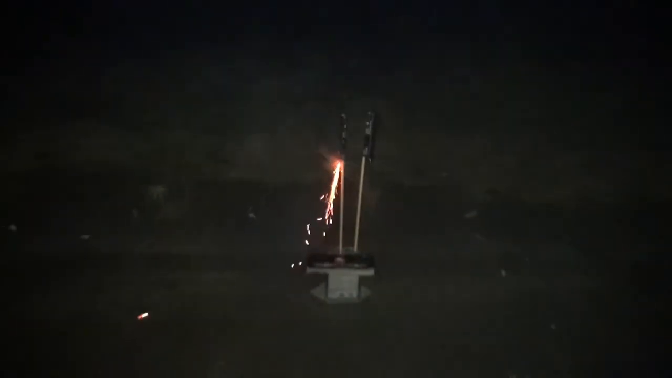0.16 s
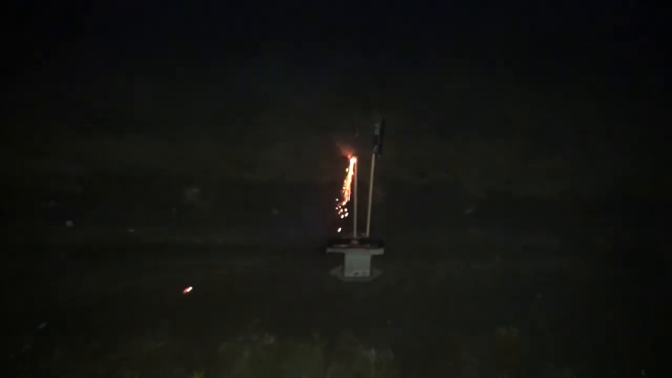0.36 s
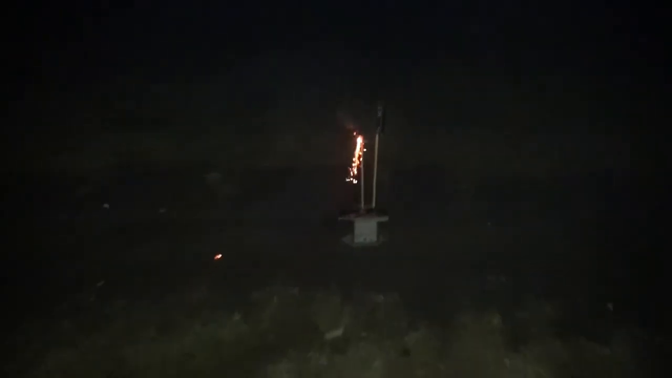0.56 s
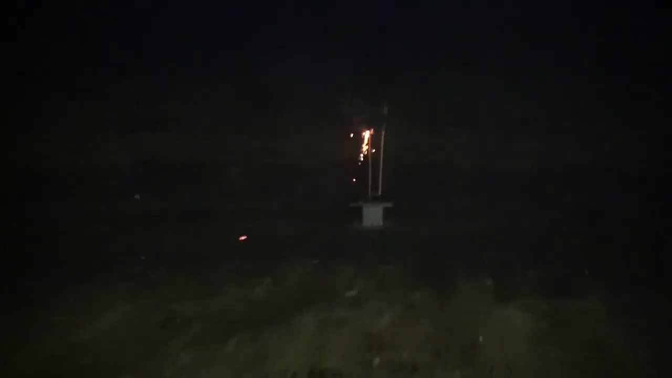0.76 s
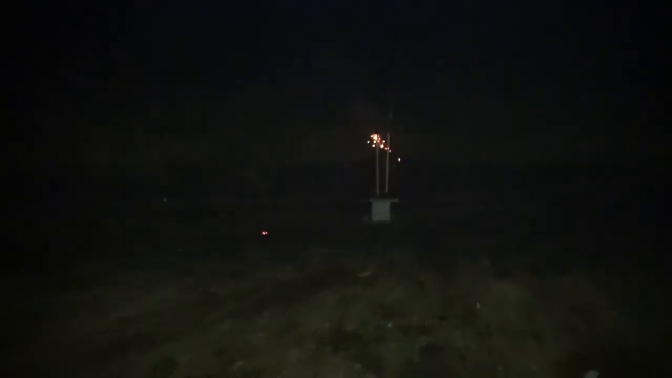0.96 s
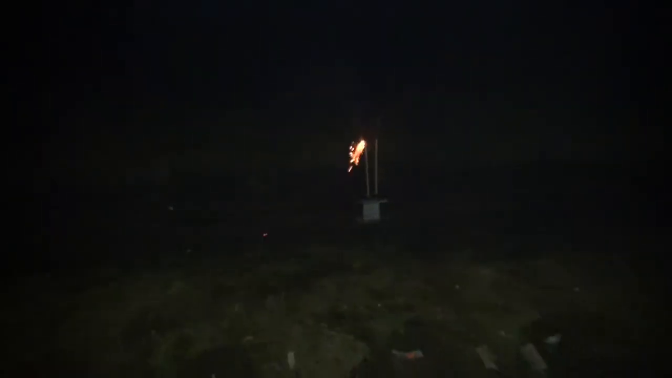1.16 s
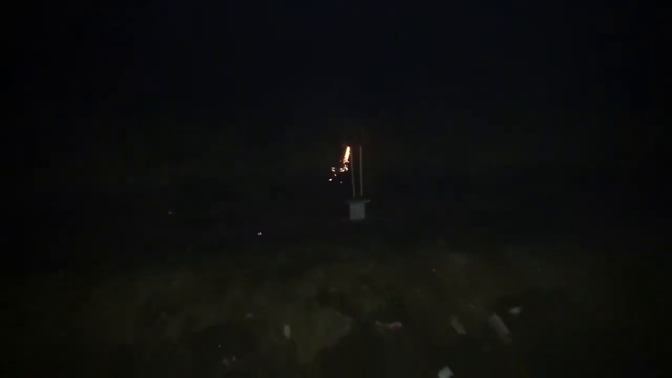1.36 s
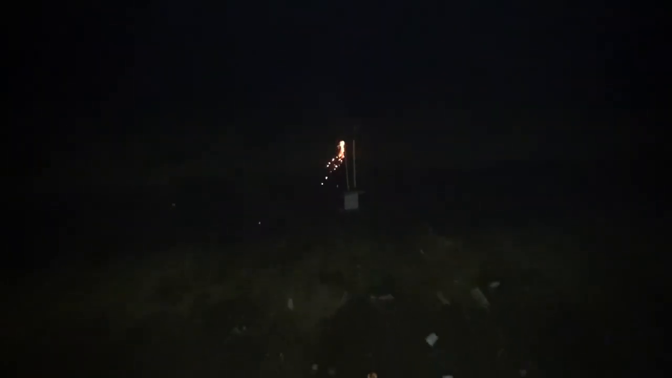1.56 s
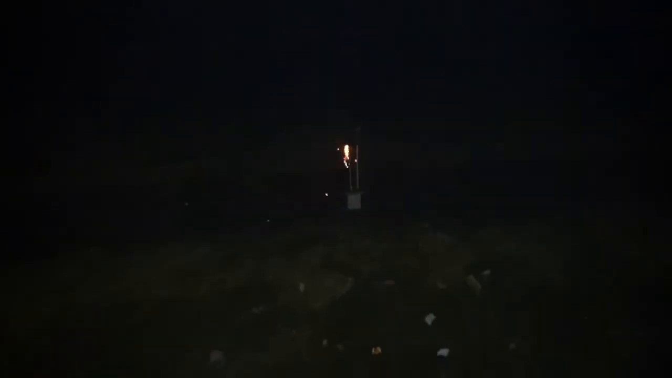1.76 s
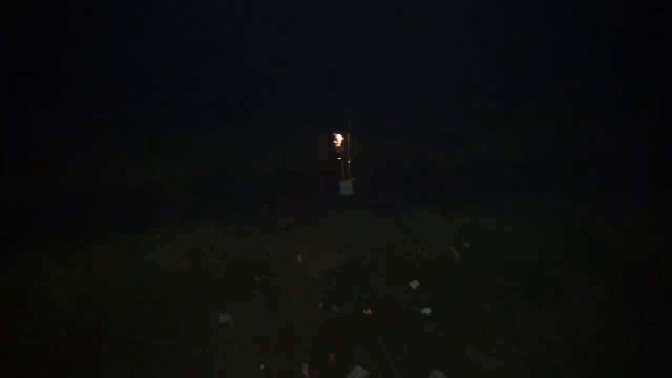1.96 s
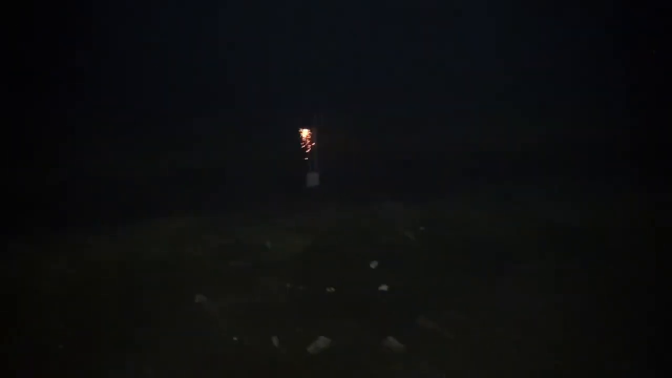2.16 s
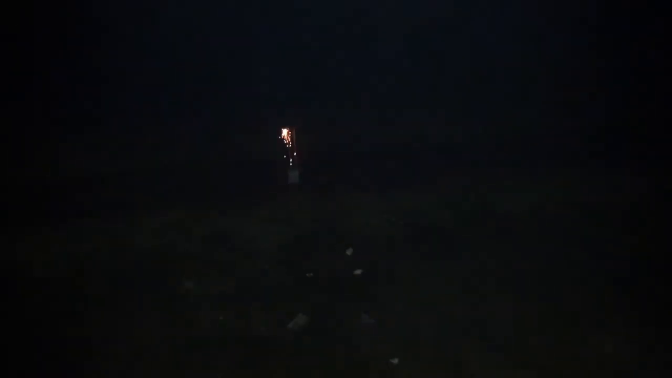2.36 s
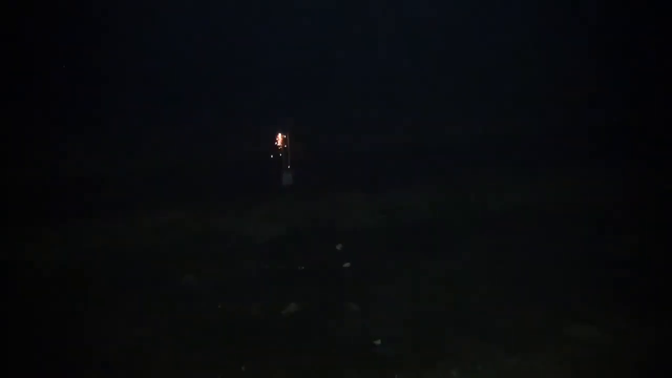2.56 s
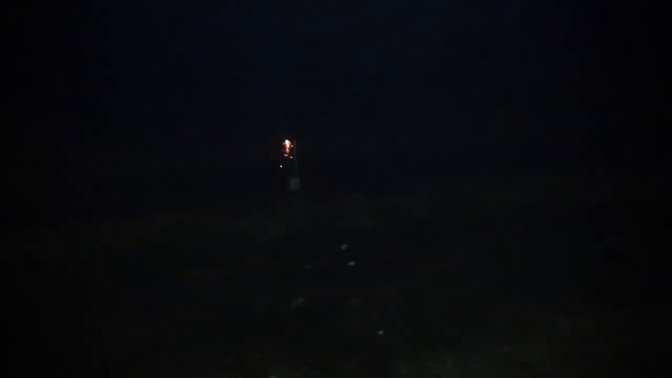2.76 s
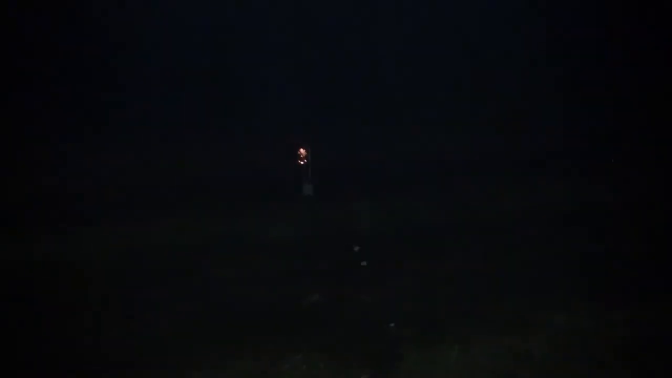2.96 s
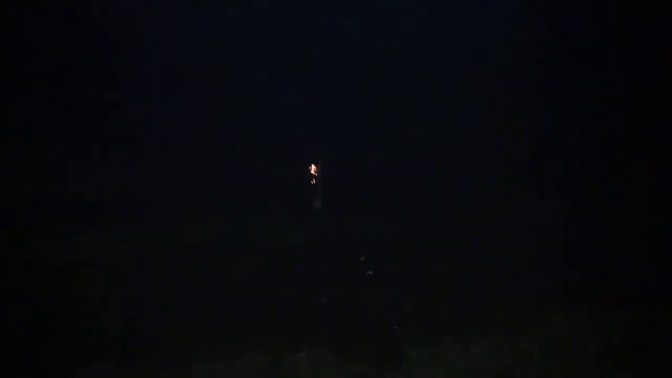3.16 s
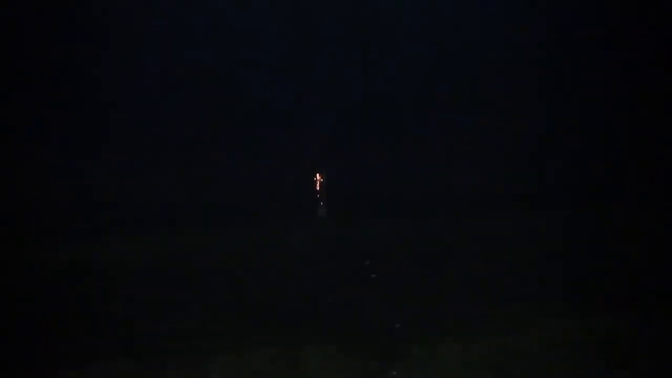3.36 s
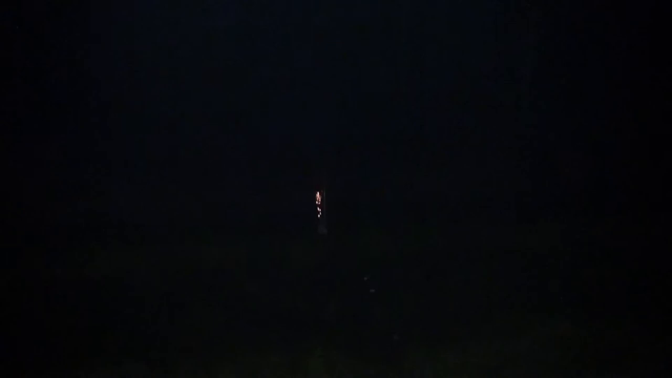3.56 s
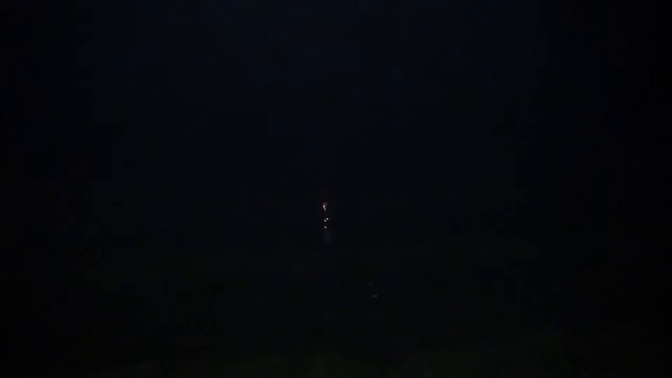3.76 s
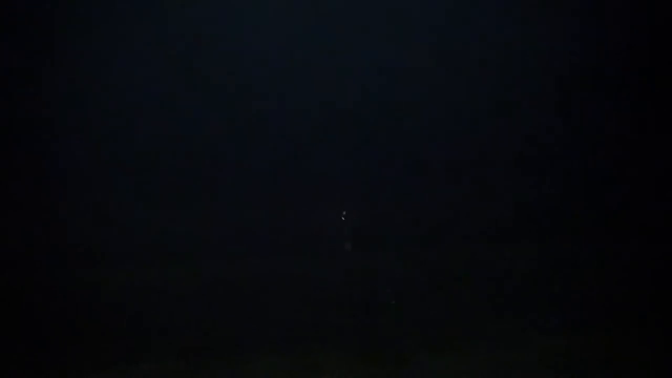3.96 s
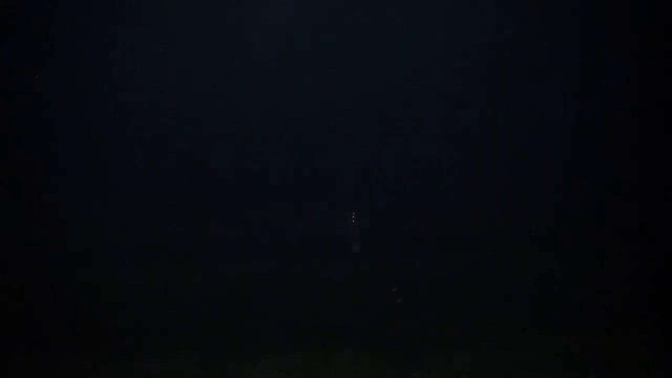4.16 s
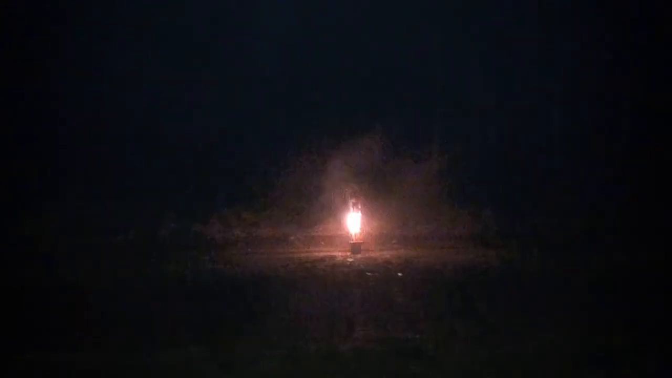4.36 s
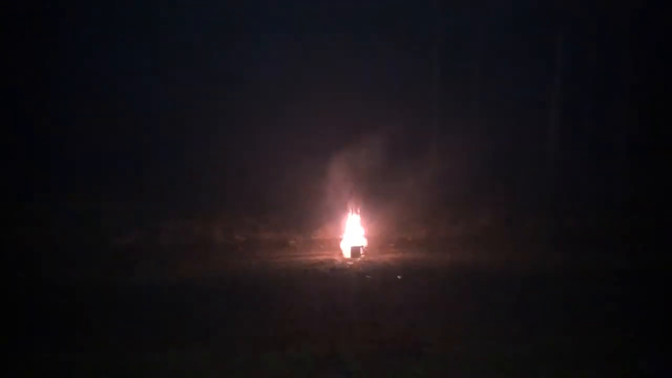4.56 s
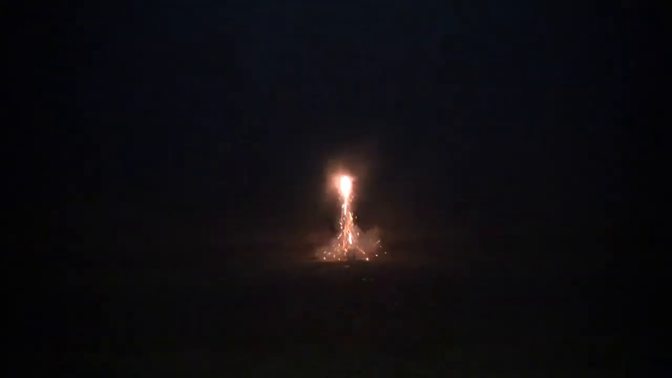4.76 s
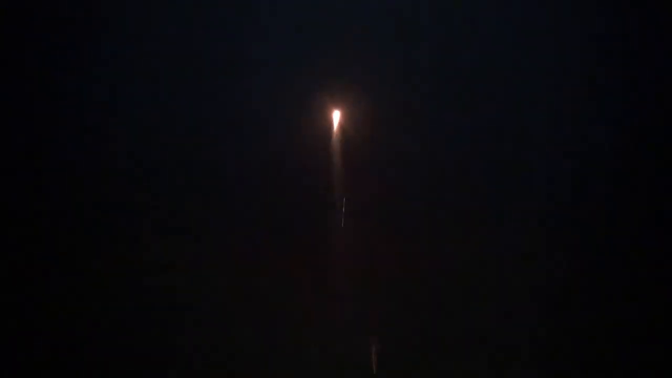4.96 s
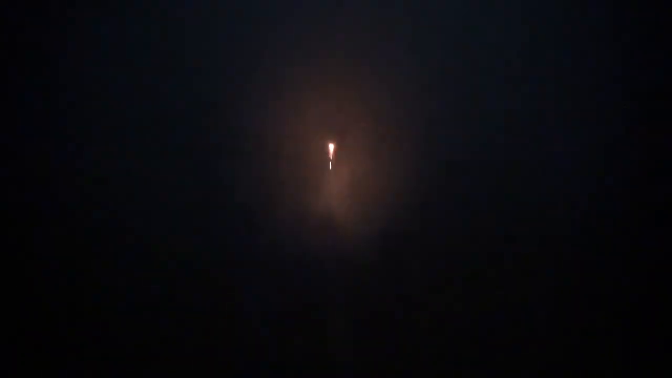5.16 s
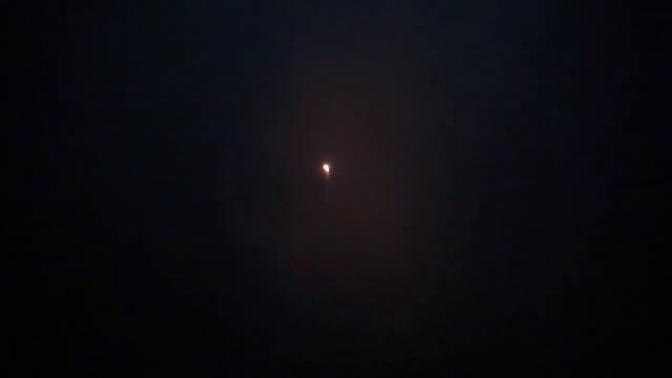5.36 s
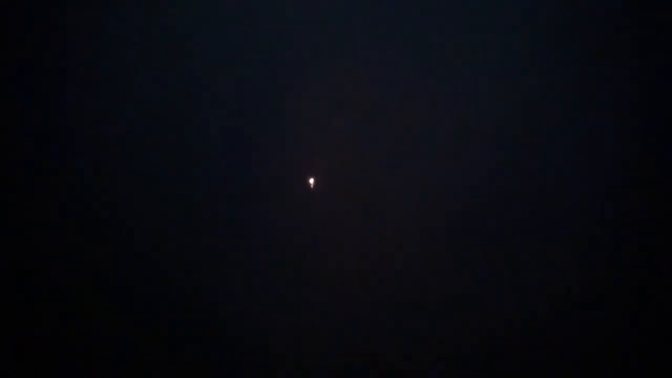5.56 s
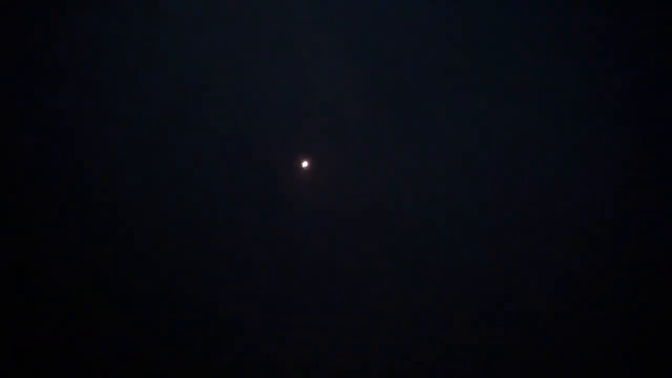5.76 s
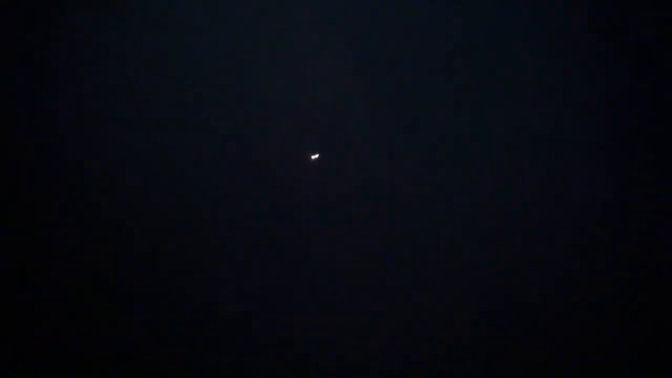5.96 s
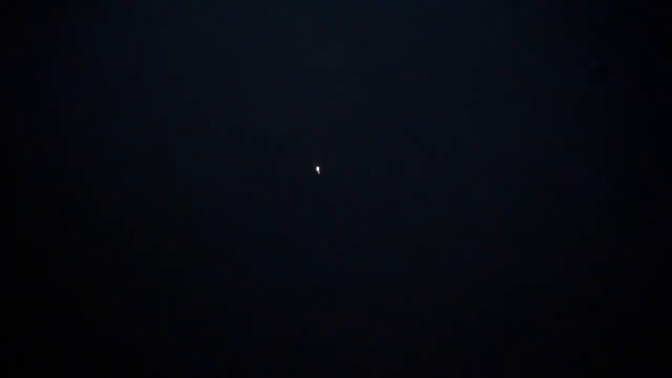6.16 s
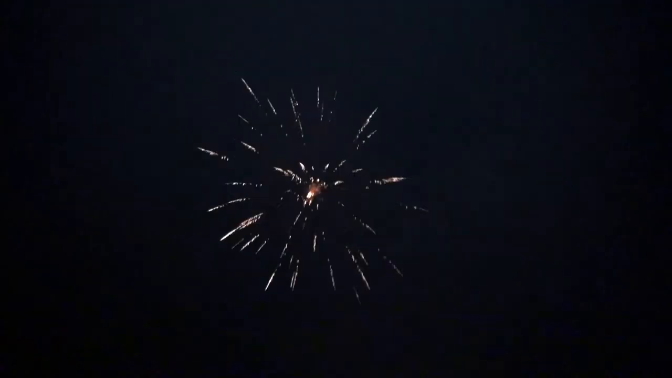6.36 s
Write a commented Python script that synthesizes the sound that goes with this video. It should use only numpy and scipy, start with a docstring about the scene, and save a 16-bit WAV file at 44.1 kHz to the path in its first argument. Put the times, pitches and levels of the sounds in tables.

```python
"""Whistling rocket in a field at night.

The fuse fizzes and spits while the camera backs away over the grass. The motor catches with a hiss,
then shrieks and climbs; the pitch falls as the tube burns hollow and the rocket recedes. The ground
mirrors the sound, distant trees scatter it back, and the shriek overloads the microphone."""
import sys
import numpy as np
from scipy import signal
from scipy.fft import rfft, irfft, next_fast_len
from scipy.io import wavfile
from scipy.ndimage import map_coordinates

SR = 44100
rng = np.random.default_rng(int(sys.argv[2]) if len(sys.argv) > 2 else 0)


def inscribe(sig):
    """Save sig as 16-bit PCM at rate SR to the path in sys.argv[1].

    A 1-D sig is mono; a 2-D sig holds one channel per row.
    Samples are clipped to [-1, 1] before scaling.
    """
    pcm = np.round(np.clip(np.atleast_2d(sig).T, -1, 1) * 32767)
    wavfile.write(sys.argv[1], SR, pcm.astype(np.int16))


N = 282240
TIME = np.arange(N) / SR
IGNITION_S, LAUNCH_S, LIFT_OFF_S = 4.53, 4.688, 4.738
CAMERA_HEIGHT_M, STAND_HEIGHT_M = 1.5, 0.29
TOP_HZ = 15700


def amp(db):
    """Decibels to gain."""
    return 10 ** (np.asarray(db) / 20)


def unit(x):
    """Scale to rms 1."""
    return x / np.sqrt(np.mean(x ** 2) + 1e-20)


def along(points, hz):
    """Read (f/Hz, value) points on a log axis."""
    f, v = np.transpose(points)
    return np.interp(np.log(hz + 1), np.log(f + 1), v)


def curves(rows):
    """Per-sample curve for each column after t/s."""
    s, *cols = np.transpose(rows)
    return [np.interp(TIME, s, c) for c in cols]


def wobble(knots_per_s):
    """Smooth random curve."""
    knots = rng.standard_normal(int(N * knots_per_s / SR) + 4)
    return map_coordinates(knots, [TIME * knots_per_s])


def spurt(peak_s, half_s):
    """Gaussian swell, peak 1."""
    return np.exp(-((TIME - peak_s) / half_s) ** 2)


def filtered(x, response):
    """Zero-phase filter with gain response(hz)."""
    size = next_fast_len(N + SR // 2)
    return irfft(rfft(x, size) * response(np.fft.rfftfreq(size, 1 / SR)), size)[..., :N]


def dulled(x, share, corner_hz):
    """Low-pass a share of x."""
    share = np.clip(share, 0, 1)
    return (1 - share) * x + share * filtered(x, lambda hz: 1 / (1 + (hz / corner_hz) ** 4))


def pair(apart, size=N):
    """White noise at two ports; apart is the uncorrelated share of the power."""
    common = np.sqrt(1 - apart) * rng.standard_normal(size)
    return common + np.sqrt(apart) * rng.standard_normal((2, size))


def rush(colour, apart):
    """Coloured stereo noise, rms 1."""
    return unit(filtered(pair(apart), lambda hz: amp(along(colour, hz))))


def burst(start_s, centre_hz, octaves, envelope):
    """Short band of noise under an envelope."""
    size = len(envelope)
    hz = np.fft.rfftfreq(size, 1 / SR) + 1
    band = 1 / (1 + (np.log2(hz / centre_hz) / octaves) ** 2)
    sound = unit(irfft(rfft(pair(apart=0.12, size=size)) * band, size)) * envelope
    return np.pad(sound, ((0, 0), (round(start_s * SR), N)))[:, :N]


def positions():
    """The camera backs away, then stands; the rocket speeds up toward the balance of drag and thrust."""
    start_m, pace_m_per_s, stop_s = 1.2, 1.27, 3.7
    thrust_m_per_s2, top_speed_m_per_s = 36, 36.8
    away_m = start_m + pace_m_per_s * np.minimum(TIME, stop_s)
    run_up_s = top_speed_m_per_s / thrust_m_per_s2
    flight_s = np.maximum(TIME - LIFT_OFF_S, 0)
    climb_m = top_speed_m_per_s * run_up_s * np.log(np.cosh(flight_s / run_up_s))
    return away_m, STAND_HEIGHT_M + climb_m


def distance_db():
    """Direct-path gain re 1 m."""
    away_m, height_m = positions()
    return -20 * np.log10(np.hypot(away_m, height_m - CAMERA_HEIGHT_M))


def grounded(x, mirror):
    """Add the ground reflection at gain mirror: a comb that slides with the geometry."""
    sound_m_per_s = 343
    away_m, height_m = positions()
    direct_m = np.hypot(away_m, height_m - CAMERA_HEIGHT_M)
    bounced_m = np.hypot(away_m, height_m + CAMERA_HEIGHT_M)
    lag_s = (bounced_m - direct_m) / sound_m_per_s
    echo = np.array([map_coordinates(side, [(TIME - lag_s) * SR], order=3) for side in x])
    return (x + mirror * echo) / np.sqrt(1 + mirror ** 2)


def trees(x, apart, build_s):
    """Diffuse echo from the field's edge; the treble dies first."""
    # echo decay: f/Hz, t60/s
    decay_times = [(200, 2.2), (2000, 1.61), (4000, 1.45), (8000, 1.24), (15000, 0.76)]
    hz, t, spectra = signal.stft(pair(apart, size=2 * SR), SR, nperseg=256)
    envelope = amp(-60 * t / along(decay_times, hz)[:, None]) * (1 - np.exp(-t / build_s))
    tail = signal.istft(spectra * envelope, SR, nperseg=256)[1]
    return signal.fftconvolve(x[None], tail / np.linalg.norm(tail[0]), axes=1)[:, :N]


def night():
    """Still air over the field; a breeze on each port, stirred by the camera's first move."""
    # breeze spectrum: f/Hz, density/dB
    rumble = [(8.8, -7), (15, 7), (31, -1.5), (70, -14), (92, -29), (145, -37), (250, -40), (320, -55),
              (550, -120)]
    # still-air spectrum: f/Hz, density/dB
    still_air = [(60, -9), (177, -7), (900, 0.5), (1600, -13), (3000, -11.5), (7000, -9), (9000, -13),
                 (12000, -15), (15400, -30)]
    stir_db, settle_s = 14, 1.33
    breeze_db = -54.5 + stir_db * np.exp(-TIME / settle_s) + 2.6 * wobble(5.4)
    return amp(breeze_db) * rush(rumble, apart=1.0) + amp(-69) * rush(still_air, apart=0.52)


def walking():
    """Soft steps backward: shoes brush the grass; steps and grip jolt the camera."""
    # grass scuffs: t/s, relative level/dB, centre/Hz, length/s, width/octaves
    scuffs = [(0.108, -42.5, 1430, 0.045, 0.52), (0.17, -40, 1070, 0.041, 0.82),
              (0.201, -40.5, 1890, 0.035, 0.59), (0.359, -36.5, 1180, 0.025, 0.45),
              (0.838, -39, 2230, 0.039, 1.15), (1.034, -43.5, 660, 0.032, 0.29),
              (3.375, -50, 1600, 0.027, 0.85)]
    # camera bumps: t/s, level/dB, t60/s
    bumps = [(.024, -42.5, 0.18), (.088, -44.5, 0.59), (0.27, -47, 0.13), (0.47, -49.5, 0.34),
             (0.653, -30.5, 0.098), (.969, -43.5, 0.17), (1.075, -46, 0.2), (1.532, -54, .13),
             (1.967, -55, 0.08), (2.18, -52.5, 0.21), (2.449, -54, 0.11), (2.605, -58, .1),
             (2.694, -56, 0.12), (4.117, -49, 0.091)]
    # bump spectrum: f/Hz, density/dB
    bump_colour = [(30, -21), (90, 12), (170, 0.5), (260, -4.5), (330, 5), (430, -16), (600, -33),
                   (1500, -54)]
    attack_s = 0.0087
    t = TIME[:SR // 4]
    grass, jolts = np.zeros((2, N)), np.zeros(N)
    for start_s, db, hz, length_s, octaves in scuffs:
        arch = np.sin(np.pi * np.clip(t / length_s, 0, 1))
        grass += burst(start_s, hz, octaves, amp(db - 11.5) * arch)
    for start_s, db, t60_s in bumps:
        age_s = np.maximum(TIME - start_s, 0)
        jolts += amp(db - 60 * age_s / t60_s) * (1 - np.exp(-age_s / attack_s))
    return grass + jolts * rush(bump_colour, apart=0.54)


def burn_levels():
    """The fizz fades as the spark creeps toward the nozzle; the flame flares just before ignition."""
    # fuse spurts: peak t/s, half length/s, fizz change/dB, flame change/dB
    spurts = [(0.106, 0.07, 6, 2), (0.315, 0.13, -1.5, 12.5), (0.46, .04, 4.5, -7),
              (.635, 0.042, 6.5, -5.5), (1.423, 0.39, 4.5, -1), (2.326, 0.079, 4.5, 5.5),
              (3.39, 0.069, 5, 4), (3.55, .025, 6, -1), (3.84, .03, 10, 0), (4.11, 0.022, 4.5, 8)]
    fade_db_per_s, flare_db, flare_s = 2, 18.5, 0.23
    fizz_db = -50 + distance_db() - fade_db_per_s * TIME
    flame_db = -72 + flare_db * np.exp(np.minimum(TIME - IGNITION_S, 0) / flare_s)
    for peak_s, half_s, more_fizz_db, more_flame_db in spurts:
        fizz_db += more_fizz_db * spurt(peak_s, half_s)
        flame_db += more_flame_db * spurt(peak_s, half_s)
    return fizz_db, flame_db


def flame_ring():
    """Half-pitched band of flame noise that rises and widens into a puff at ignition."""
    # band track: t/s, centre/Hz, level/dB
    track = [(.9, 1200, -82), (2, 1852, -70.5), (3.7, 2290, -71.5), (4.32, 2030, -62), (4.5, 2990, -58),
             (4.63, 3400, -51), (4.68, 3650, -42)]
    # band widening: t/s, wide share/0-1
    widening = [(4.3, .1), (4.5, .85)]
    ring_hz, ring_db = curves(track)
    share, = curves(widening)
    phase = 2 * np.pi * np.cumsum(ring_hz) / SR
    narrow = wobble(470) * np.cos(phase) + wobble(580) * np.sin(phase)
    wide = wobble(1300) * np.cos(phase) + wobble(1300) * np.sin(phase)
    return amp(ring_db + 0.98 * wobble(18)) * (np.sqrt(1 - share) * narrow + np.sqrt(share) * wide)


def fuse():
    """Powder burns in a stream of tiny sparks over a breathy flame, with a few louder spits."""
    # fizz spectrum: f/Hz, density/dB
    fizz_colour = [(300, -2), (600, -3), (1200, -6), (3400, -8), (6000, -6), (8500, -5.5), (10500, -10),
                   (13000, -7), (15500, -11)]
    # flame spectrum: f/Hz, density/dB
    flame_colour = [(300, -13), (900, -6), (1400, -0.5), (2200, -6), (3000, -6), (4000, -8), (6000, -11),
                    (12000, -45)]
    # ground reflection of the fizz, stronger at a flatter angle: t/s, gain/0-1
    grazing = [(.3, .12), (1.2, .55)]
    # fuse spits: t/s, relative level/dB, centre/Hz, t60/s
    spits = [(0.538, -39.5, 5440, 0.06), (1.002, -34, 5000, 0.034), (1.31, -42, 1140, .04),
             (1.619, -43.5, 980, 0.047), (1.707, -40, 1400, 0.053), (3.415, -45, 1000, .04)]
    spark_db, sputter_db, surge_db = 1.6, 1.2, 1.1
    fizz_db, flame_db = burn_levels()
    sparks = unit(amp(spark_db * wobble(630) + sputter_db * wobble(29.52) + surge_db * wobble(12)))
    in_nozzle = (TIME - 3.3) / 0.7
    fizz = amp(fizz_db) * sparks * dulled(rush(fizz_colour, apart=0.39), in_nozzle, corner_hz=7200)
    flame = amp(flame_db + 0.72 * wobble(25.2)) * rush(flame_colour, apart=0.2)
    sound = grounded(fizz, mirror=curves(grazing)[0]) + grounded(flame, mirror=0.31)
    sound = (sound + flame_ring()) * (TIME < LAUNCH_S)
    t = TIME[:SR // 4]
    for start_s, db, hz, t60_s in spits:
        sound += burst(start_s, hz, octaves=1.1, envelope=amp(db - 10.5 - 60 * t / t60_s))
    return sound


def exhaust():
    """The motor catches with a soft whoosh; the jet hisses and crackles, smoother and duller from afar."""
    # build-up to full thrust: t/s, level/dB
    thrust = [(4.3, -60), (4.5, -36), (4.6, -35), (4.675, -21.5), (4.7, -7.5), (5.27, -6), (5.35, -7)]
    # jet spectrum: f/Hz, density/dB
    jet_colour = [(60, -27), (200, -9.5), (800, -4), (1600, -0.5), (2400, 0.5), (3200, -3), (5000, -1),
                  (6500, 1), (8500, 2.5), (11000, -3.5), (15500, -7)]
    # brief tears in the jet: peak t/s, half length/s, change/dB
    tears = [(4.864, 0.025, 3.5), (5.086, 0.009, -3), (5.182, 0.021, 2.5), (5.239, 0.0057, 7.5),
             (5.285, 0.017, 2)]
    # crackle depth: t/s, share/0-1
    harshness = [(5.3, 0.7), (5.45, 0.34)]
    flicker_db = 2.5 * wobble(1200) + 0.78 * wobble(220) + 1.1 * wobble(45)
    crackle = amp(curves(harshness)[0] * flicker_db - 1)
    tear_db = sum(db * spurt(peak_s, half_s) for peak_s, half_s, db in tears)
    jet_db = curves(thrust)[0] + distance_db() + tear_db
    receded = (TIME - 5.3) / 0.54
    jet = amp(jet_db) * crackle * dulled(rush(jet_colour, apart=0.24), receded, corner_hz=7576)

    # whoosh spectrum: f/Hz, density/dB
    whoosh_colour = [(50, -2), (150, -1), (450, -2.5), (1000, -15), (4000, -46)]
    attack_s, fade_db_per_s = 0.13, 11
    age_s = TIME - IGNITION_S
    swell = np.clip(1 + age_s / attack_s, 0, 1) ** 2
    whoosh_db = -48.5 - fade_db_per_s * np.maximum(age_s, 0)
    whoosh = swell * amp(whoosh_db) * rush(whoosh_colour, apart=0.25)
    return grounded(jet + whoosh, mirror=0.17)


def whistle():
    """Fuel burns in pulses at the tube's resonance: a steep wave, duller from behind and from afar."""
    # falling pitch: t/s, f/Hz
    glide = [(4.7, 3150), (4.742, 2954), (4.79, 2760), (4.865, 2705), (4.95, 2555), (5.054, 2477),
             (5.13, 2504), (5.22, 2400), (5.32, 2336), (5.594, 2191), (5.83, 2035), (6.1, 1938),
             (6.4, 1862)]
    # harmonics by direction: order, side/dB, behind/dB, scattered/dB
    harmonics = [(1, 2, -1, -2), (2, -4.5, -17.5, -14), (3, -9, -31, -17.5), (4, -17.5, -32.5, -15.5),
                 (5, -18, -37, -26.5), (6, -46, -42, -34), (7, -37, -41, -32)]
    # tube drive: t/s, level/dB
    drive = [(4.7, 10.5), (4.88, 14.5), (5.05, 14.5), (5.3, 17.5), (5.6, 17), (6.4, 13)]
    # ground reflection: t/s, gain/0-1
    reflection = [(4.8, 0.3), (4.9, 0.58), (5.05, 0.4), (5.2, 0.19)]
    # sound reaching the trees, strongest once the rocket is above them: t/s, level/dB
    tree_feed = [(4.7, -21), (5.3, -14), (5.7, -18.5), (6.4, -27)]
    bright_db_per_octave, dulling_per_octave, astern_m = 8.5, 0.37, 3.3
    sawtooth_lean_rad, right_shift_rad, pan_db = 0.22, 0.85, 1.19

    age_s = np.maximum(TIME - LAUNCH_S, 0)
    sharp_start = 1 + 0.15 * np.exp(-age_s / 0.004)  # the tube is still very short
    burn_jitter = 1 + 0.0025 * wobble(120) + 0.0046 * wobble(1100)
    pitch_hz = curves(glide)[0] * sharp_start * burn_jitter
    phase = 2 * np.pi * np.cumsum(pitch_hz) / SR
    onset = np.clip((TIME - LAUNCH_S) / 0.0053 + 0.5, 0, 1)
    burn = onset * amp(1.01 * wobble(300))
    climb_m = positions()[1] - STAND_HEIGHT_M
    astern = 1 - np.exp(-climb_m / astern_m)
    far_db = distance_db()
    tilt_db_per_octave = bright_db_per_octave + dulling_per_octave * far_db

    direct, spread = np.zeros((2, N)), np.zeros(N)
    for order, (_, side_db, behind_db, scattered_db) in enumerate(harmonics, start=1):
        in_band = np.clip((TOP_HZ - order * pitch_hz) / 1000 + 1, 0, 1)
        shift_rad = np.array([[0], [right_shift_rad]]) * (order > 1)
        partial = np.cos(order * phase + (order - 1) * sawtooth_lean_rad + shift_rad) * in_band
        aspect_db = side_db + astern * (behind_db - side_db)
        tilt_db = (tilt_db_per_octave + 1.17 * wobble(60)) * np.log2(order)
        direct += amp(aspect_db + tilt_db) * partial
        spread += amp(scattered_db) * partial[0]
    near = grounded(direct * burn * amp(curves(drive)[0] + far_db), mirror=curves(reflection)[0])
    scattered = trees(spread * burn * amp(curves(tree_feed)[0]), apart=0.74, build_s=0.036)
    return (near + scattered) * amp([[-pan_db], [pan_db]])


def scene():
    """All sources at the two microphone ports, stronger on the right."""
    # port sensitivity, rows left and right: gain/dB
    ports_db = [
        [-4.1],
        [2.3],
    ]
    return (fuse() + walking() + whistle() + exhaust() + night()) * amp(ports_db)


def record(dry):
    """The lopsided shriek clips at full scale, which also makes a low flutter; then the band limit."""
    fade_hz = 300
    oversampled = signal.resample_poly(dry, 2, 1, axis=1)
    clipped = signal.resample_poly(np.clip(oversampled, -1, 1), 1, 2, axis=1)
    return filtered(clipped, lambda hz: np.sin(np.pi / 2 * np.clip((TOP_HZ - hz) / fade_hz + .5, 0, 1)) ** 2)


dry = scene()
out = record(dry)
inscribe(out)
```